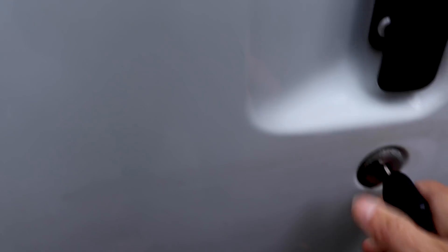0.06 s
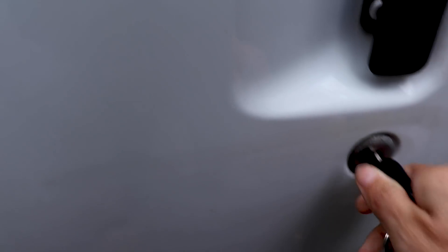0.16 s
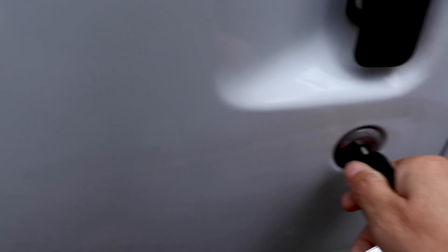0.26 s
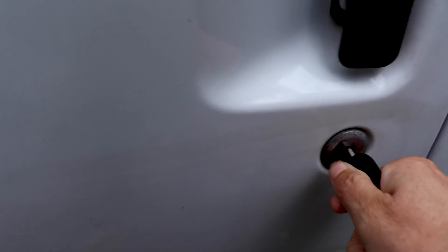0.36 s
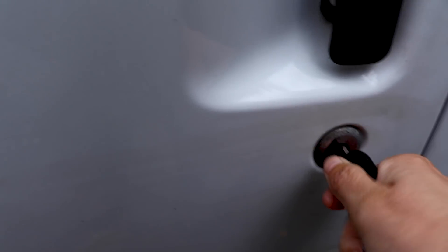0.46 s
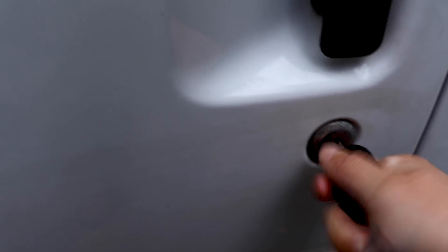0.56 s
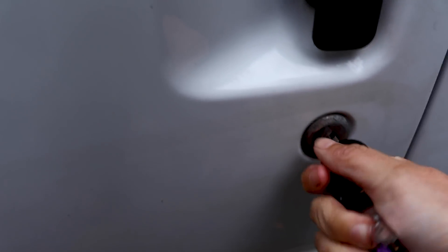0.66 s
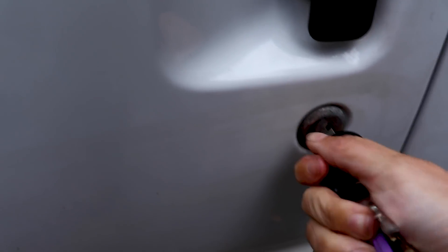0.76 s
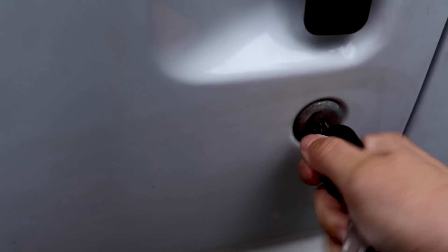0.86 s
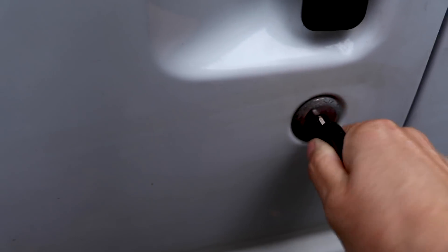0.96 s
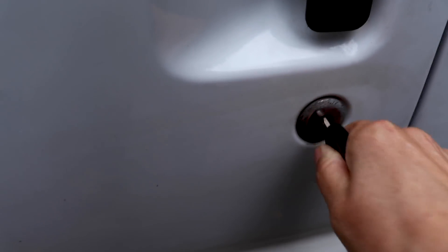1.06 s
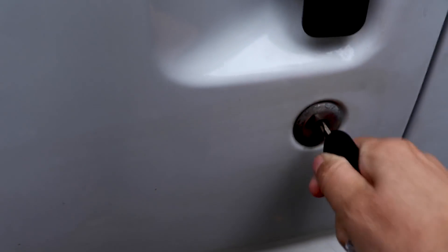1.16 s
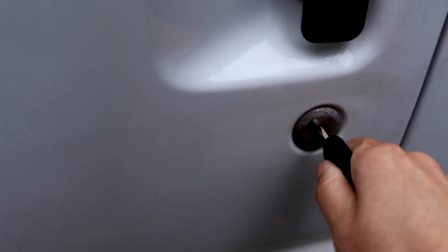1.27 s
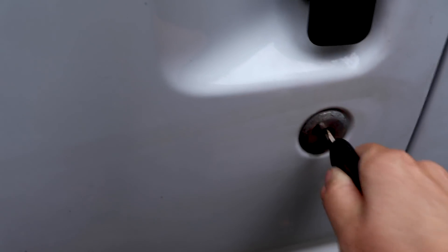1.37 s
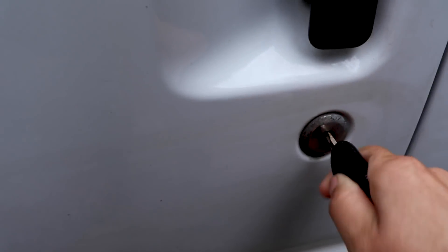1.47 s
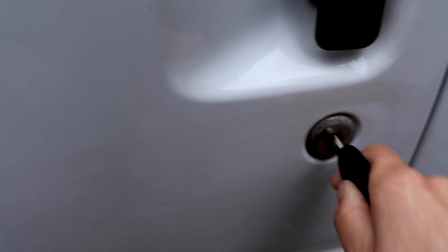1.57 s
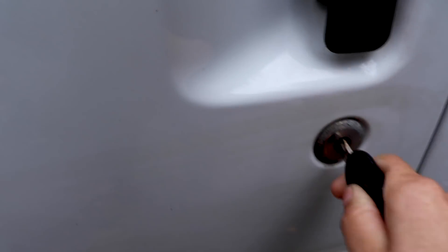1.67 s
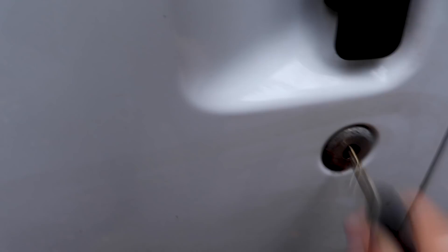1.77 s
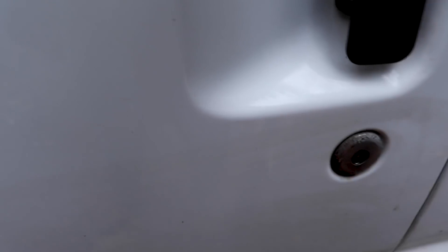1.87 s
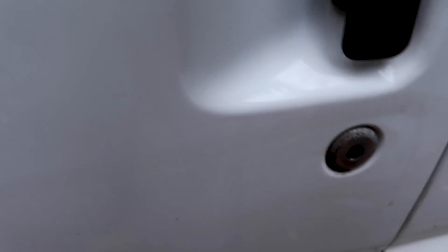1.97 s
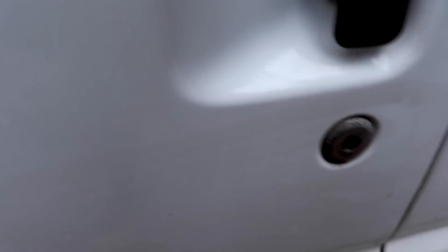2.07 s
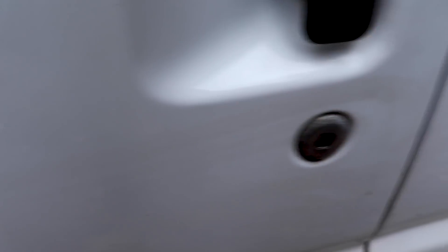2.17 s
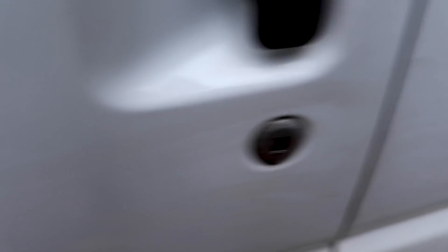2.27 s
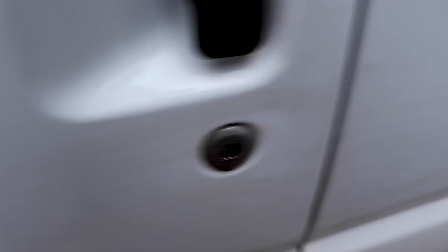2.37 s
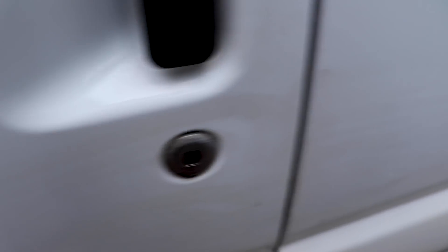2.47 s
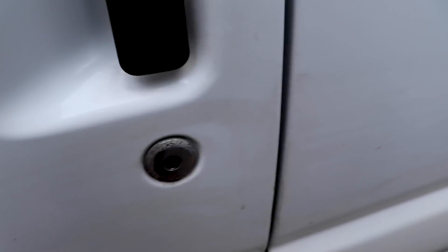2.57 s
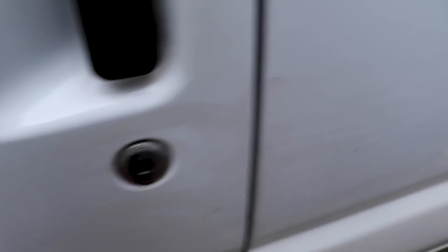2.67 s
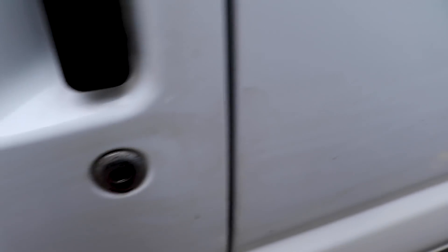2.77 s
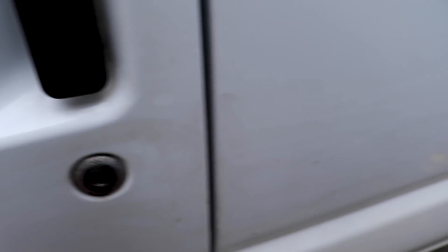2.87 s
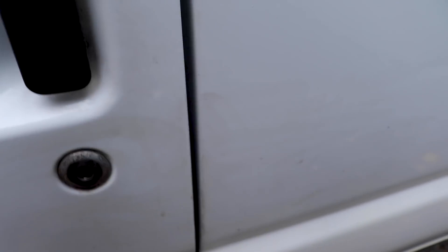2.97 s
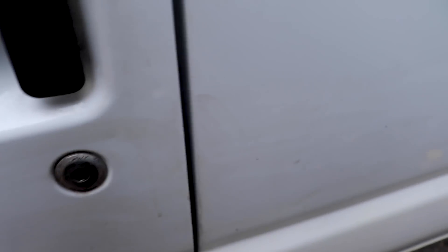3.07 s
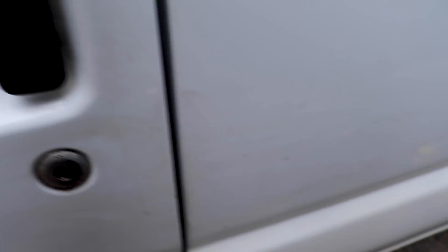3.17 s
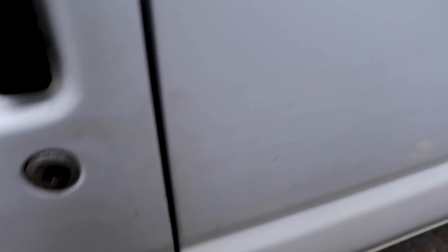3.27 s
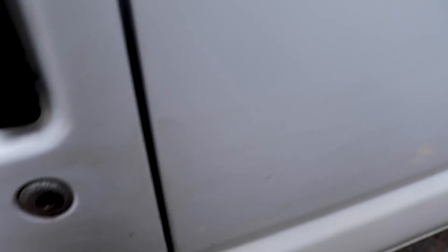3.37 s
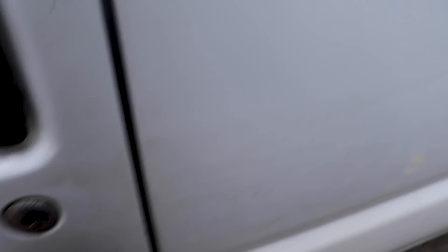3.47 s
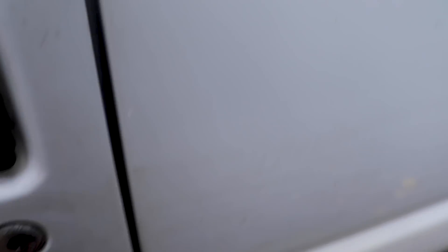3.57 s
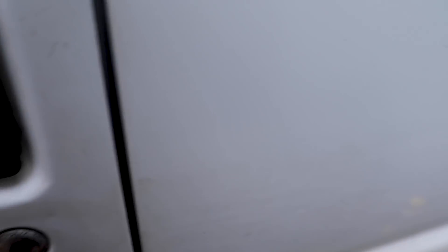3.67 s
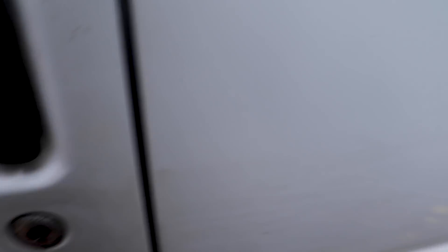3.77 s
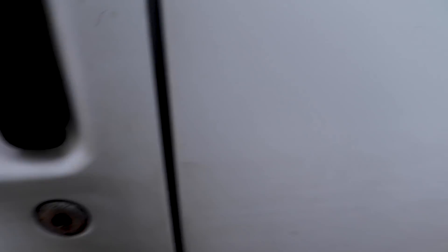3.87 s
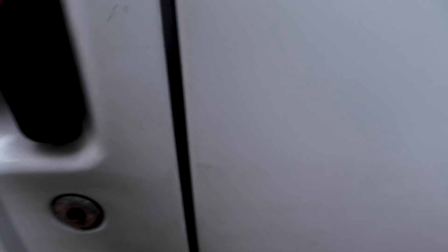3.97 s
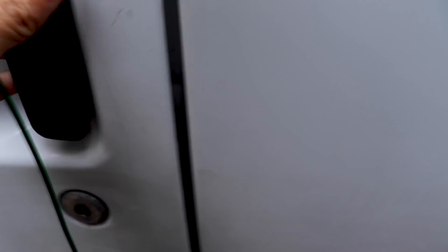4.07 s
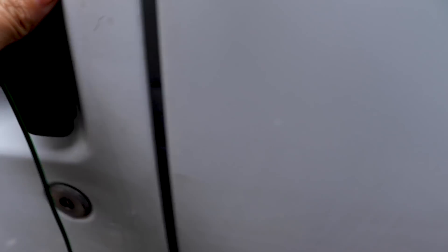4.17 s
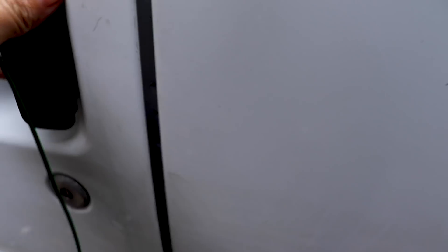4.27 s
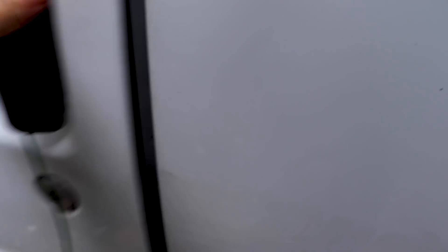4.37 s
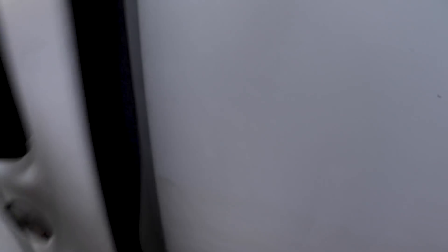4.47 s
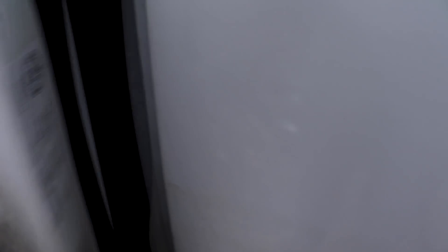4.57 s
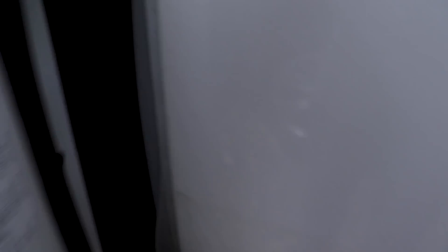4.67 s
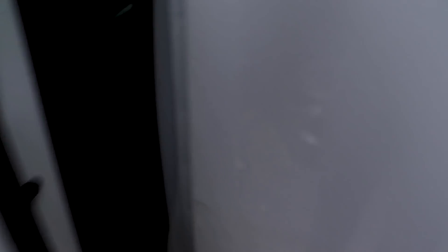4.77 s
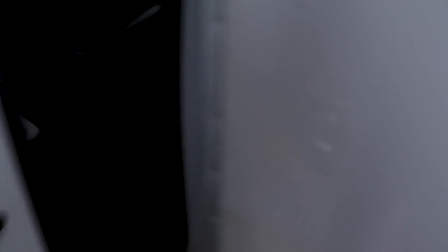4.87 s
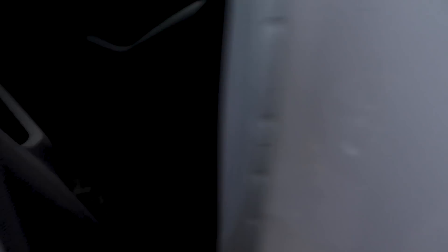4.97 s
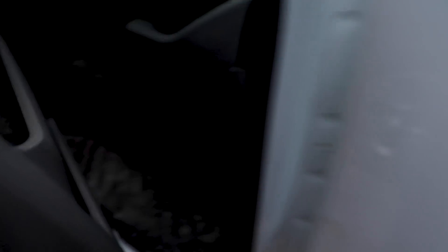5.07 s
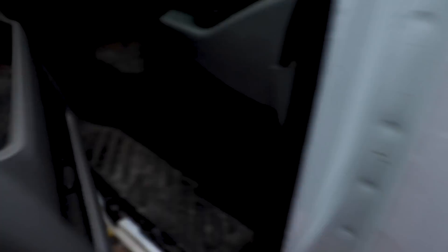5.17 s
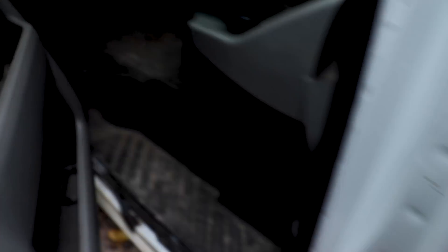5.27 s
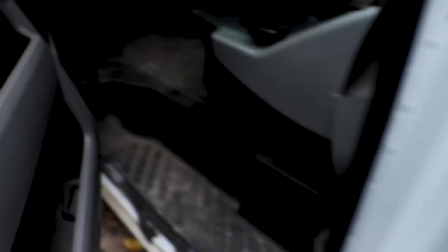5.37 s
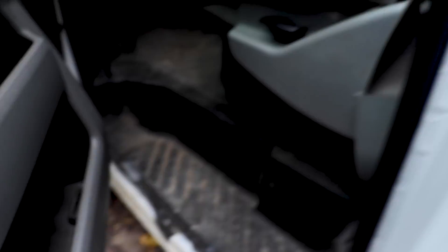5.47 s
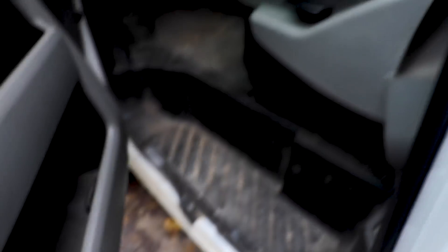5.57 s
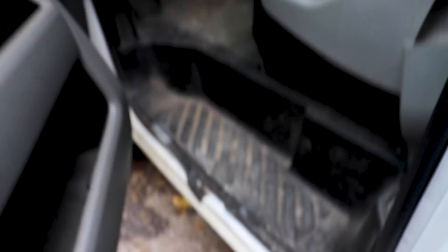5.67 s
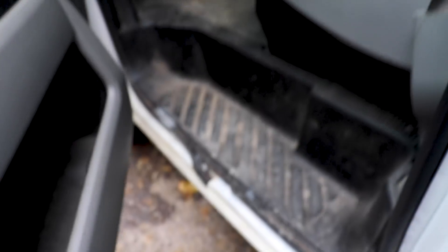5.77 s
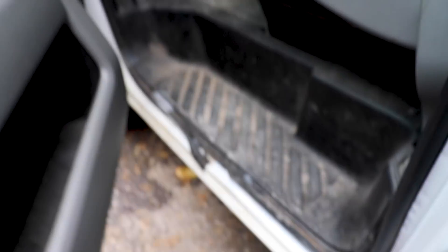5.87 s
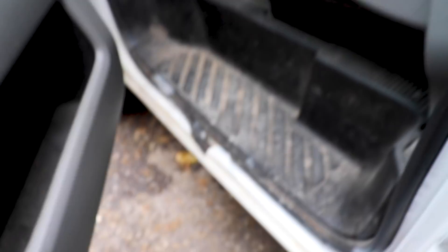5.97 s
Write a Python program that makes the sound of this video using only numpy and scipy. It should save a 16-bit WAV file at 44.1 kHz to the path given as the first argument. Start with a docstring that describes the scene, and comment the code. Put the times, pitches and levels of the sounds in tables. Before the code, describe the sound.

Close up outdoors beside a van, a bunch of keys clinks as a key scrapes into the door lock. The barrel turns with hard hollow clacks and rattles, then a thump and bright jingle as the key comes out. After a near-silent pause the handle clicks and the latch releases with a loud, overloaded clunk, followed by small knocks and a faint swish of the opening door.

```python
"""Outdoors, beside a van: a key is pushed into the door lock, turned and pulled out while the bunch clinks.
Struck keys, lock parts and the hollow steel door are sums of decaying modes with short noise bursts.
Sliding contacts are streams of random slips. The keys are put away, the handle is pulled, the latch lets go
with a loud clunk and the door swings open. Faint outdoor noise and puffs of air lie beneath.
A close microphone with gain control overloads on the clunk."""
import sys
import numpy as np
from scipy import signal
from scipy.fft import rfft, irfft
from scipy.io import wavfile
from scipy.ndimage import uniform_filter1d, minimum_filter1d

SR = 44100
rng = np.random.default_rng(int(sys.argv[2]) if len(sys.argv) > 2 else 0)


def generate_wav(signal):
    """Clip the signal to [-1, 1] and save it as 16-bit WAV at the path in sys.argv[1]."""
    frames = np.transpose(np.atleast_2d(signal))
    scaled = np.clip(frames, -1, 1) * 32767
    pcm = np.round(scaled).astype(np.int16)
    wavfile.write(sys.argv[1], SR, pcm)


N = 265482
TIME = np.arange(N) / SR  # seconds

# modes of the hollow steel door: (frequency [Hz], level [dB], t60 [s])
DOOR_RESONANCES = [(101.8, 0.5, 0.76), (113.7, -4, 1), (125.8, 0, 0.85), (145.94, 2, 0.6),
                   (170.3, -2.5, 0.5), (190.6, 2, 0.57), (225, 3, 0.22), (274, -3, 0.45),
                   (307.8, -3.5, 0.13), (379.4, 0, 0.32), (414, -7, 0.58), (527.4, -3, 0.42),
                   (636, -27.5, 0.33), (649, -8, 0.61), (740, -7, 0.26), (848, -13, 0.32), (910, -27, 0.53),
                   (1160, -55, .25), (1294, -6.5, 0.2), (1390, -16, 0.043), (1777, -9, 0.058)]
# modes of the lock barrel and its rods: (frequency [Hz], width [Hz], level [dB])
BARREL_RESONANCES = [(570, 104, 9), (810, 55, 2.5), (1180, 250, -11), (1599, 59, -9.5), (1874, 130, -17.5),
                     (2052, 31, -10), (2350, 39, -7.5), (2650, 70, -9), (3360, 35, -6), (3150, 14, -58),
                     (4114, 38, -14.5), (4400, 53, -9)]


def amp(db):
    """Level in decibels to amplitude ratio."""
    return 10 ** (np.asarray(db) / 20)


def unit(x):
    """Normalise by energy: rms 1."""
    return x / np.sqrt(np.mean(x ** 2))


def crest(x):
    """Normalise by short-time energy: the loudest two milliseconds have rms 1."""
    power = uniform_filter1d(x ** 2, size=88, mode="constant")
    return x / np.sqrt(power.max())


def peak(x):
    """Normalise by amplitude: peak 1."""
    return x / np.abs(x).max()


def fade(t60, count):
    """Exponential damping: 60 dB lost in t60 seconds."""
    return np.exp(-np.log(1000) * TIME[:count] / max(t60, 1e-3))


def band(x, hz, width):
    """Second-order resonance, gain 1 at its centre."""
    g = np.tan(np.pi * min(hz, .45 * SR) / SR)
    k = width / hz  # damping, the inverse of Q
    numerator = [g * k, 0, -g * k]
    denominator = [1 + g * k + g * g, 2 * (g * g - 1), 1 - g * k + g * g]
    return signal.lfilter(numerator, denominator, x)


def cut(x, hz, kind, order=2):
    """Butterworth filter: low-pass or high-pass."""
    sos = signal.butter(order, min(hz, .45 * SR), kind, fs=SR, output="sos")
    return signal.sosfilt(sos, x)


def tone(hz, t60, count):
    """Impulse response of one mode: a damped sinusoid."""
    return np.sin(2 * np.pi * hz * TIME[:count]) * fade(t60, count)


def ring(modes, scatter_db, detune, count):
    """Modal superposition: a random striking point sets the strengths and signs; pitches scatter too."""
    chance = rng.standard_normal((len(modes), 3))
    out = np.zeros(count)
    for (hz, db, t60), (strength, pitch, sign) in zip(modes, chance):
        mode = tone(hz * (1 + detune * pitch), t60, count)
        out += np.sign(sign) * amp(db + scatter_db * strength) * mode
    return out


def burst(t60, count):
    """High modal density: the many short-lived modes of a contact merge into decaying noise."""
    return rng.choice([-1, 1], count) * fade(t60, count)


def walk(rate):
    """Slow random drift: normal values, rate per second, joined by straight lines."""
    knots = rng.standard_normal(int(TIME[-1] * rate) + 2)
    return np.interp(TIME * rate, np.arange(len(knots)), knots)


def grains(rate, spread_db, count=N):
    """Stick-slip as a random point process: slips, a few much larger than the rest, over a faint rub."""
    timing, size, offset = rng.random((count, 3)).T
    rub = (offset - .5) * 0.18
    sizes = amp(spread_db * np.minimum(-np.log(1 - size), 3))
    slips = (timing < rate / SR) * np.sign(offset - .5) * sizes
    return unit(rub + slips)


def swells(rows, attack_s, release_s, rest_db):
    """Exponential envelopes: each push builds up, holds and dies away, above a resting level."""
    gain = amp(rest_db)
    for start, end, db in rows:
        before = np.maximum(start - TIME, 0) / attack_s
        after = np.maximum(TIME - end, 0) / release_s
        gain = np.maximum(gain, amp(db) * np.exp(-(before + after)))
    return gain


def add(out, s, x):
    """Linear superposition: mix x in at time s."""
    i = max(int(s * SR), 0)
    out[i:i + len(x)] += x[:N - i]


def clink(hz, ring_db, edge_db, count=4000):
    """Impact and rebound: two keys excite each other's modes, damped by their neighbours."""
    # modes of keys and ring: (frequency [Hz], level [dB], t60 [s])
    key_modes = [(2700, 12, 0.0086), (3030, 2, 0.02), (3740, -1, 0.031), (4490, 1.5, 0.039),
                 (5130, -9, 0.029), (5750, -29, .03), (6200, -29, 0.036), (7390, 6.5, 0.036),
                 (8950, -3, 0.053), (9140, -2, 0.029), (9600, -29, 0.0083), (11000, -36, 0.019),
                 (11900, -6, 0.072), (13470, 3, 0.023)]
    out = np.zeros(count)
    for force_db in (0, -10, -17):
        tick = band(burst(0.0055, count), hz, .5 * hz)
        metal = band(ring(key_modes, scatter_db=4, detune=.04, count=count), hz, 1.6 * hz)
        lag = rng.integers(80, 340) if out.any() else 0  # samples; rebounds follow within milliseconds
        contact = crest(tick) + amp(ring_db) * crest(metal)
        out[lag:] += amp(force_db) * contact[:count - lag]
    body = peak(cut(cut(out, hz + 7000, "low"), 1700, "high"))
    edge = peak(cut(burst(0.013, count), 8500, "high", order=3))  # hard edges give the finest treble
    return body + amp(edge_db) * edge


def keys():
    """Modal radiation of light bodies: the clear clinks of the bunch, and the thin ring of a free key."""
    # keys striking each other:
    # (time [s], level [dB], brightest frequency [Hz], lasting ring [dB], hard edge [dB])
    clink_events = [(0.02, -27.5, 4600, 10, 3), (0.058, -29, 7240, 2, -18),
                    (0.1077, -12.5, 9500, -3.5, -23), (0.1557, -22.5, 13400, -1, -15),
                    (0.1618, -23, 7600, -19, -15), (0.194, -23.5, 13670, 1, -10.5),
                    (0.2137, -22, 7160, 4, -17), (0.272, -27, 7410, 10, -20), (0.3497, -31, 4800, 0, -1),
                    (0.401, -31, 5500, 4, -15), (0.423, -30, 7530, -4, -12), (0.4461, -18.5, 7350, 0, -7),
                    (0.5265, -15.5, 8300, -9.5, -2), (0.601, -32, 10600, -17, -12),
                    (0.953, -27.5, 4920, -3, 6), (1.138, -22.5, 4300, -7, 0), (1.2085, -16, 5000, 2, 7),
                    (1.263, -27, 8100, -3, -1), (1.28, -22, 4140, -12, -7), (1.5748, -19.5, 4040, -24, -32),
                    (1.8382, -6, 4440, -13, -15), (1.8555, -16, 9200, -12, -14),
                    (1.8682, -9, 9700, -15, -13), (1.8836, -11, 4760, -9, -15), (1.888, -7, 4050, -14, -2),
                    (2.05, -29, 7600, -6, -16), (2.085, -19.5, 8200, 2, -23),
                    (2.1338, -21.5, 9300, 5, -14.5), (2.2618, -29, 6570, -10.5, -13),
                    (2.272, -27.5, 6400, -8, -25), (2.3387, -9, 6500, -18, -13),
                    (2.343, -14, 10360, -18, -19), (2.3504, -17, 9700, -7, -21),
                    (2.4014, -23, 9300, 0, -26), (2.4239, -16.5, 4840, -1, -24),
                    (2.452, -23, 5580, -12, -27), (2.484, -20, 6700, -12, -21),
                    (2.6268, -18.5, 6300, 10.5, -24), (2.637, -14.5, 6300, 3, -16),
                    (2.7332, -19, 5970, -9, -14), (2.7546, -18.5, 5790, -5, -12),
                    (2.7642, -19.5, 5600, -4, -6), (2.7873, -19, 7340, -10.5, -2),
                    (2.863, -27, 6250, 3, -5), (3.036, -27, 8000, -8, -2), (4.825, -30, 9100, -6, -1)]
    # one key hangs free and sings on: (time [s], level [dB])
    free_key = [(.109, -53), (2.134, -43), (2.686, -45)]
    out = np.zeros(N)
    for s, db, hz, ring_db, edge_db in clink_events:
        add(out, s, amp(db) * clink(hz, ring_db, edge_db))
    for s, db in free_key:
        add(out, s, amp(db) * tone(hz=11750, t60=0.14, count=12000))
    return out


def jostle():
    """Dense random impacts: the swinging keys brush each other too lightly to stand out one by one."""
    # the bunch swinging: (start [s], end [s], level [dB], touch rate [1/s])
    swings = [(0, 0.283, -36.5, 270), (0.342, 0.581, -38.5, 83), (0.931, 1.168, -36.5, 110),
              (1.839, 1.899, -30, 350), (1.984, 2.145, -37, 50), (2.241, 2.62, -45.5, 220),
              (2.71, 2.812, -39, 240)]
    out = np.zeros(N)
    touches = [clink(hz, ring_db=-4, edge_db=-14) for hz in np.geomspace(3000, 11000, 24)]
    for start, end, db, rate in swings:
        length = end - start
        chance = rng.random((100, 3))
        for when, which, force in chance[:int(rate * length)]:
            touch = touches[int(which * len(touches))]
            add(out, start + when * length, amp(db + 4.6 * (force - .5)) * touch)
    return out


def door(reach_hz, count=36000):
    """Plate modes over a wash of weaker ones; a soft blow, long in contact, only reaches the low ones."""
    modes = crest(ring(DOOR_RESONANCES, scatter_db=2, detune=.015, count=count))
    wash = crest(band(cut(burst(0.28, count), 125, "high"), 286, 250))
    return crest(cut(modes + .8 * wash, reach_hz, "low"))


def lock(count=14000):
    """Impact of snapping steel and plastic parts: hollow clack, barrel modes, bright edge, door's answer."""
    # hard blows in lock, handle and latch:
    # (time [s], level [dB], body frequency [Hz], barrel ring [dB], bright snap [dB], t60 [s])
    hard_blows = [(0.11, -25, 548, -3, 4.5, 0.11), (0.4, -29, 517, 1.5, -5, 0.073),
                  (0.590, -14.5, 760, -24, -18, 0.033), (0.677, -13.5, 530, -27, -7.5, 0.095),
                  (0.686, -7.5, 540, -17, -13, 0.076), (0.691, -2.5, 608, 1.5, -5.5, 0.077),
                  (0.748, -15.5, 536, -17, -25, 0.072), (0.803, -28, 660, -18, -11, 0.031),
                  (0.908, -27.5, 490, -4, -16, 0.027), (0.962, -18.5, 497, -6, -26, 0.042),
                  (0.983, -17.5, 1780, 4.5, -11, .06), (0.99, -9, 444, -21, -19, 0.073),
                  (1.009, -15.5, 520, 2, -9.5, 0.17), (1.041, -14.5, 500, 1.5, -14, 0.12),
                  (1.058, -10.5, 1770, -6, -18, 0.073), (1.207, -7.5, 825, -4, -1.5, 0.011),
                  (1.217, -10, 504, -10, -14, 0.021), (1.541, -26.5, 520, -7, -25, 0.12),
                  (1.649, -29.5, 490, -2, -8, 0.06), (1.749, -30.5, 460, 1.5, -17, 0.082),
                  (2.686, -3.5, 753, -34, -14.5, 0.032), (2.692, -16, 680, -28, -21, 0.053),
                  (2.831, -22.5, 530, -5, -7.5, 0.042), (2.891, -12.5, 925, 5, 4.5, 0.02),
                  (3.015, -23.5, 2260, 3, -1, 0.026), (3.034, -23, 2600, 1, 6, 0.09),
                  (3.052, -17, 875, -18, 0.5, 0.037), (3.162, -24.5, 2960, -8, -5, .054),
                  (3.214, -23.5, 2310, -22, 10, 0.011), (3.257, -21.5, 3020, -7, 6.5, 0.014),
                  (4.161, -18, 553, -6, -14.5, 0.14), (4.174, -20.5, 536, -2.5, -13, 0.12),
                  (4.219, -22.5, 513, -15, -19, 0.093), (4.243, -11, 562, -32, -28, 0.057),
                  (4.279, -23.5, 760, -29, -31, 0.034), (4.597, -16.5, 940, -15, -20, 0.047),
                  (4.616, -18.5, 833, -37, -17, .11), (4.687, -27, 583, -35, -4.5, 0.046),
                  (4.763, -12, 747, -4, -21, 0.043), (4.822, -26.5, 2160, -1, -0.5, 0.063),
                  (4.843, -29, 1590, -4, 5.5, 0.088), (4.919, -34.5, 468, -22, -24, 0.075),
                  (4.957, -33, 520, -19, -1, 0.045), (5.322, -24.5, 1130, -21, -1.5, 0.082),
                  (5.48, -34.5, 1717, -8, 5, 0.13), (5.531, -40.5, 1050, -7, 3.5, 0.13),
                  (5.846, -32, 935, -4, -12, 0.093)]
    panel_db = -16  # the door's answer, relative to the blow
    out = np.zeros(N)
    barrel_modes = [(hz, db, 1.0 / width) for hz, width, db in BARREL_RESONANCES]  # wider modes die sooner
    for s, db, hz, barrel_db, snap_db, t60 in hard_blows:
        clatter = band(burst(t60, count), hz, 0.4 * hz)
        hollow = crest(cut(clatter, 2.73 * hz, "low", order=3))
        clack = peak(hollow + amp(-1.5) * tone(hz, t60, count))
        barrel_ring = ring(barrel_modes, scatter_db=2.5, detune=0.0095, count=count)
        barrel = peak(band(barrel_ring, 2100, 2900))
        bright = cut(burst(.5 * t60, count), 1900, "high")
        snap = peak(cut(band(bright, 2500, 4700), 9200, "low"))
        panel = peak(door(2 * hz, count))
        blow = clack + amp(barrel_db) * barrel + amp(snap_db) * snap + amp(panel_db) * panel
        add(out, s, amp(db) * blow)
    return cut(out, 120, "high")  # small parts give no bass


def latch(count=8000):
    """Release of stored force: the door springs off its seal, metal stops are hit, the panel rings on."""
    # the latch lets go, then the pawl and claw hit their stops:
    # (time [s], level [dB], frequency [Hz], t60 [s])
    release_blows = [(4.439, 7.5, 125.6, 0.038), (4.440, 3.5, 199, 0.024), (4.4432, 4, 650, 0.046),
                     (4.4461, 2.5, 881, 0.028), (4.4490, 1, 1196, 0.034)]
    out = np.zeros(N)
    for s, db, hz, t60 in release_blows:
        crack = crest(cut(band(burst(t60, count), 2 * hz, 3.2 * hz), 1950, "low"))
        blow = crest(tone(hz, t60, count)) + amp(-5.5) * crack
        add(out, s, amp(db) * cut(blow, 4 * hz, "low"))  # the rubber seal softens the low blows
    add(out, release_blows[2][0], amp(-5.0) * door(1800))
    return cut(out, 93, "high")


def thumps(count=14000):
    """Momentum transfer: the key bottoming out and the rods throwing over shove the whole panel."""
    # heavy blows on the door: (time [s], level [dB], thud frequency [Hz], t60 [s], door ring [dB])
    heavy_blows = [(0.215, -29, 194, 0.025, 4.5), (0.591, -17.5, 221, 0.035, -2.5),
                   (0.693, -19.5, 395, 0.015, 11.5), (1.194, -12.5, 175, 0.14, 4),
                   (1.21, -13, 252, 0.043, -3.5), (1.833, -3, 131, 0.1, -4.5), (1.888, -17, 138, .066, 0.5),
                   (1.951, -13.5, 145.6, 0.11, -14), (2.686, -19, 176.5, 0.14, -23),
                   (2.923, -25, 141, 0.13, -24), (3.233, -25, 123, .062, -7.5),
                   (3.946, -30.5, 216, 0.022, -23), (4.544, -11.5, 120.6, 0.18, -30),
                   (5.11, -31, 394, 0.096, -9.5), (5.206, -32.5, 244, 0.034, 0),
                   (5.376, -31, 225.4, 0.31, -24)]
    reach = 1.74  # a blow rings the door up to about this multiple of its thud
    out = np.zeros(N)
    for s, db, hz, t60, door_db in heavy_blows:
        thud = crest(cut(tone(hz, t60, count), 3.05 * hz, "low"))
        add(out, s, amp(db) * thud)
        add(out, s, amp(db + door_db) * door(reach * hz))
    return cut(out, 71, "high")  # a panel this size radiates little deep bass


def slides():
    """Stick-slip friction: tiny slips catch and let go, and also ring the lock barrel's modes."""
    # sliding contacts of key, handle, seal and sleeve:
    # (start [s], peak [s], end [s], level [dB], centre [Hz], width [Hz], slip rate [1/s])
    strokes = [(0, -0.013, .26, -33, 1500, 2600, 1060), (0.018, 0.107, 0.36, -48.5, 3050, 1800, 650),
               (0.195, 0.325, .56, -50.5, 1290, 2200, 700), (0.556, 0.588, .61, -30, 1500, 1900, 1600),
               (0.653, 0.689, .725, -14.5, 1940, 2980, 1640), (.69, 0.73, 0.83, -24, 560, 550, 350),
               (0.984, 0.982, 1.04, -19.5, 1930, 700, 490), (0.999, 1.004, 1.03, -25, 4000, 990, 900),
               (1.015, 1.04, 1.13, -26.5, 3200, 600, 620), (1.06, 1.063, 1.1, -19.5, 1810, 500, 780),
               (1.186, 1.212, 1.25, -19.5, 1710, 2490, 840), (1.189, 1.23, 1.36, -26, 382, 308, 790),
               (1.828, 1.84, 1.91, -17, 3780, 8800, 890), (1.879, 1.88, 1.96, -33.5, 2530, 5500, 810),
               (2.2, 2.328, 2.68, -50.5, 7000, 4500, 250), (2.702, 2.767, 2.81, -35, 4740, 7000, 480),
               (2.88, 2.89, 2.97, -32, 1910, 1610, 500), (3.001, 3.039, 3.08, -28, 1510, 4100, 350),
               (3.145, 3.215, 3.32, -37.5, 2310, 6100, 750), (3.401, 3.67, 3.8, -46.5, 3530, 7960, 1760),
               (3.943, 3.946, 4.05, -34.5, 3070, 4830, 1900), (4.017, 4.087, 4.26, -42.5, 3950, 5800, 980),
               (4.11, 4.17, 4.23, -29.5, 577, 252, 280), (4.231, 4.253, 4.32, -25.5, 1030, 880, 760),
               (4.339, 4.426, 4.44, -34.5, 1280, 1810, 1150), (4.44, 4.478, 4.6, -19.5, 960, 650, 1400),
               (4.54, 4.667, 4.75, -32, 1200, 1230, 540), (4.555, 4.568, 4.6, -40.5, 3440, 4500, 2200),
               (5.069, 5.084, 5.18, -32.5, 3620, 5030, 4900), (5.064, 5.108, 5.36, -37.5, 2020, 1110, 3500),
               (5.161, 5.282, 5.6, -40.5, 1700, 2400, 960)]
    ends_db = -21.5  # pressure at the start and end of a stroke, relative to its peak
    barrel_db = 7.5  # the barrel's ring, relative to the slips
    out = np.zeros(N)
    for start, hardest, end, db, hz, width, rate in strokes:
        t = TIME[(TIME > start) & (TIME < end)]
        catching = amp(3.5 * walk(110)[:len(t)])
        slips = grains(rate, spread_db=0.5, count=SR)[:len(t)] * catching
        barrel = unit(sum(amp(d) * band(slips, f, w) for f, w, d in BARREL_RESONANCES))
        contact = band(slips + amp(barrel_db) * barrel, hz, width)
        scrape = unit(cut(contact, 1.26 * (hz + width), "low", order=3))
        pressure = amp(np.interp(t, [start, hardest, end], [ends_db, 0, ends_db]))
        add(out, start, amp(db) * pressure * scrape)
    return out


def handling():
    """Random forcing of plate modes: fingers and key rub and nudge the door, which drums softly."""
    # the hand bearing on key or door: (start [s], end [s], drumming level [dB])
    pushes = [(0, .1, -34), (.1, 1.5, -39.5), (.72, 0.74, -21), (.93, 1.067, -25.5), (1.55, 1.78, -35),
              (4.54, 4.68, -39.5), (5.29, 5.39, -34.5)]
    nudges = grains(rate=500, spread_db=6.5)
    modes = [amp(db) * band(nudges, hz, 7 / t60) for hz, db, t60 in DOOR_RESONANCES]
    drumming = unit(cut(unit(sum(modes)), 260, "low", order=1))
    return drumming * swells(pushes, attack_s=0.033, release_s=0.11, rest_db=-53)


def outdoors():
    """Spectrally shaped noise: faint far-off sound that wavers a little, and low puffs at the microphone."""
    # spectrum of the distant outdoor noise: (frequency [Hz], relative density [dB per Hz])
    air_spectrum = [(15, 0), (25, 11.5), (217, -9.5), (270, -5), (503, -3), (677, -6), (1940, -14),
                    (2350, -13.5), (2840, -17), (8140, -21), (16000, -27.5)]
    # puffs of air on the microphone: (start [s], end [s], level [dB])
    air_puffs = [(.84, .9, -39), (1.26, 1.36, -34), (1.9, 2.05, -40), (2.6, 3.35, -38.5), (4.15, 4.35, -49),
                 (4.52, 4.6, -34), (5.2, 5.75, -46)]
    hz, db = np.transpose(air_spectrum)
    bins = np.maximum(np.fft.rfftfreq(N, 1 / SR), 1)
    shape = amp(np.interp(np.log(bins), np.log(hz), db))
    air = unit(irfft(rfft(rng.standard_normal(N)) * shape, N))
    air_gain = amp(-48 + 0.097 * walk(11))
    puffs = unit(cut(band(rng.standard_normal(N), 36.3, 39), 106, "low"))
    return air * air_gain + puffs * swells(air_puffs, attack_s=0.043, release_s=0.14, rest_db=-62)


def scene():
    """Superposition of keys, lock and door at arm's length in the open air."""
    near = keys() + jostle() + lock() + thumps() + latch() + slides() + handling()
    return (near + outdoors())[None]


def record(dry):
    """Gain reduction with hold and lag: ducks after each overload; peaks clip; the top is cut."""
    threshold, share = .76, 0.65  # of full scale; share of the excess dB taken off
    x = dry[0]
    needed = np.minimum(1, threshold / np.maximum(np.abs(x), 1e-6)) ** share
    held = minimum_filter1d(needed, size=4601, origin=2300)  # looks back about 0.1 s
    gain = 1 - cut(1 - held, 20.6, "low", order=1)  # the lag lets the first peak through
    clipped = np.clip(x * gain, -1, 1)
    top_cut = signal.ellip(8, .2, 80, 15900, fs=SR, output="sos")  # steep low-pass at 15.9 kHz
    return signal.sosfilt(top_cut, clipped)[None]


dry = scene()
out = record(dry)
generate_wav(out)
```